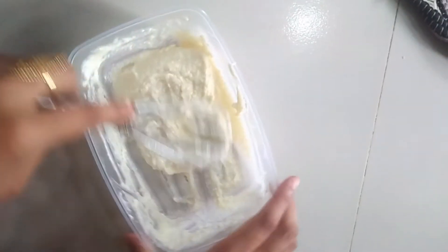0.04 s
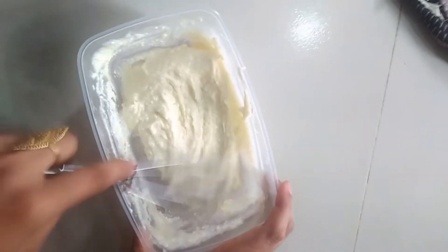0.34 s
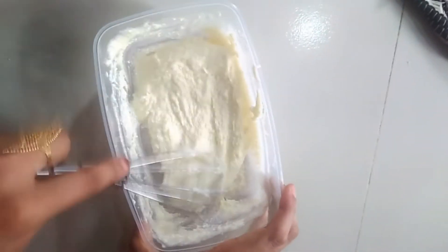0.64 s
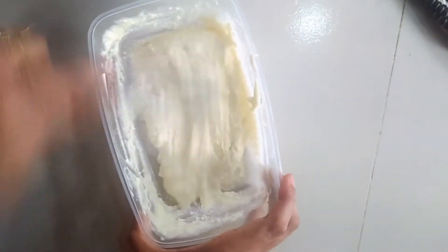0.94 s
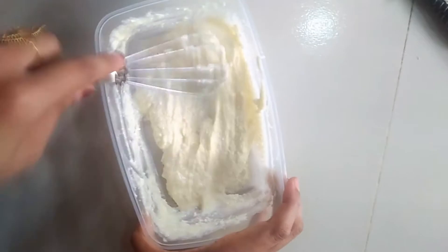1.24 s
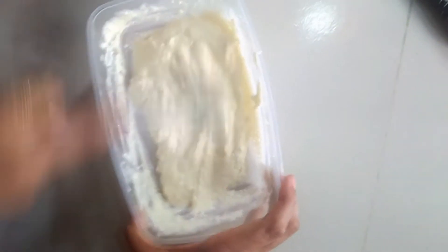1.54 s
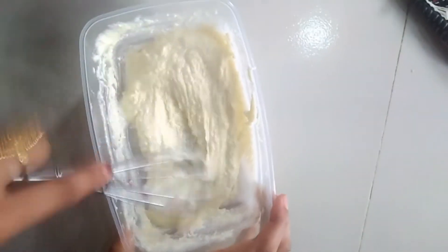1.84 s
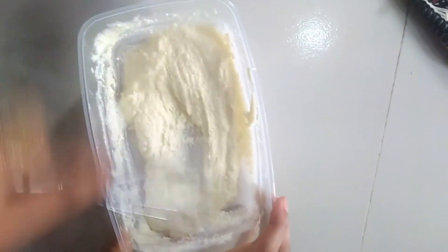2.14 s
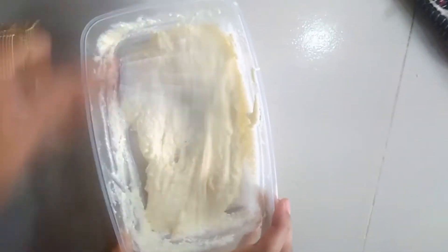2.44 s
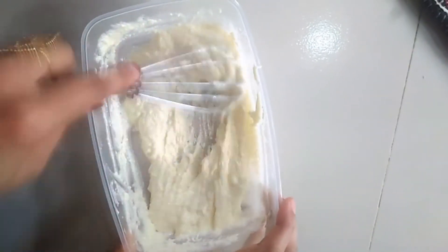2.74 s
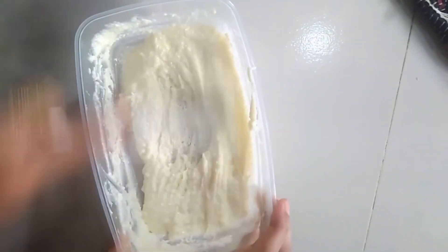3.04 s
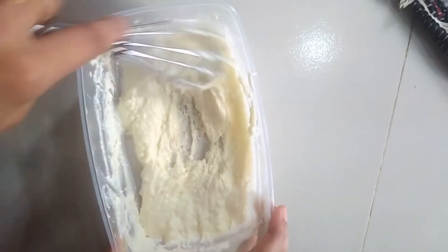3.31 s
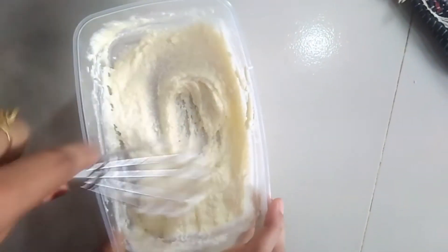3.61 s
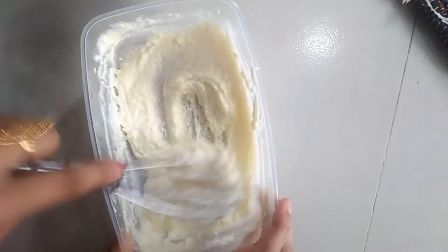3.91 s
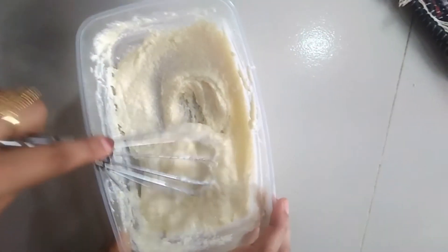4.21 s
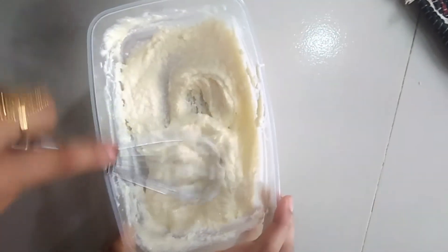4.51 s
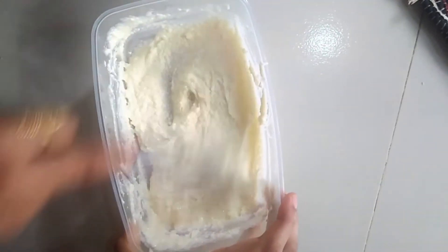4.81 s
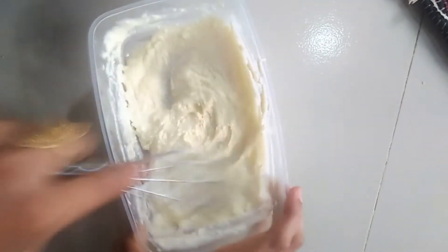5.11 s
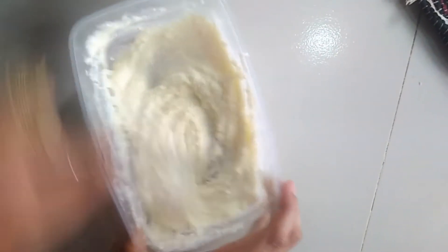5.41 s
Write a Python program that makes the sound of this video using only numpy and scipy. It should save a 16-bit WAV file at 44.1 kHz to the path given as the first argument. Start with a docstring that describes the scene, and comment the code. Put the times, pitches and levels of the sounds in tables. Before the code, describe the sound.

Irregular plastic knocks and ringing wire ticks as a whisk beats sticky cream, squelching and scraping between blows.

```python
"""Uneven plastic knocks and wiry clatter with wet squelches between: a whisk mashing thick cream in a tub.
Each blow thuds into the cream, knocks the tub's bottom, clacks its walls and sets the steel wires
chattering and ringing. Between blows the cream tears and pops, the wires drag over the plastic and
the holding hand nudges the tub. A small tiled kitchen rings on briefly over a faint hush and hum."""
import sys
import numpy as np
from scipy import signal
from scipy.io import wavfile

SR = 44100
rng = np.random.default_rng(int(sys.argv[2]) if len(sys.argv) > 2 else 0)


def digitize_waveform(pressure):
    """Quantize a signal to 16-bit integers and store it at the path in sys.argv[1].

    Rows of a 2-D input are taken as channels; values are limited to [-1, 1].
    """
    field = np.atleast_2d(pressure).T
    bounded = np.clip(field, -1, 1)
    quanta = np.round(bounded * 32767).astype(np.int16)
    wavfile.write(sys.argv[1], SR, quanta)


N = 249606

# Contacts of whisk and tub. Each row: time in seconds, then thud, bottom, wall and wire levels in dB
# (rms over 10 ms), bottom pitch in Hz, spread of the wires' landing in seconds.
BLOWS = [(.137, -71.5, -59, -64, -69.5, 852, 0.00243), (0.3699, -73.5, -45.5, -65, -77.5, 928, 0.0033),
         (0.6345, -77.5, -43.5, -51, -76, 889, 0.00612), (0.6899, -68.5, -34.5, -34, -42, 930, 0.00416),
         (.7005, -73.5, -33.5, -34.5, -47.5, 903, 0.0033), (.7055, -60, -39, -37.5, -46, 798.5, 0.001996),
         (0.8187, -67.5, -39.5, -43, -45, 983, 0.0023), (0.9804, -57, -46.5, -46, -60.5, 862, 0.00455),
         (1.064, -94.5, -35.5, -36.5, -44, 861.5, 0.00386), (1.176, -66.5, -41, -37.5, -38, 728, 0.00475),
         (1.1885, -84.5, -40.5, -50.5, -65.5, 830, 0.00497), (1.2137, -52.5, -42.5, -45, -57.5, 963, .005),
         (1.309, -79.5, -37, -38.5, -41.5, 851.5, 0.00501), (1.3851, -80.5, -48, -60, -70, 940, 0.0044),
         (1.4276, -64, -41.5, -42.5, -48, 864, 0.00218), (1.485, -52.5, -30.5, -41.5, -48, 880.6, 0.00237),
         (1.561, -72.5, -35.5, -36.5, -40, 823.4, 0.00258), (1.6408, -74, -49, -52.5, -58, 817, 0.0027),
         (1.6705, -60.5, -39.5, -36.5, -40.5, 751, 0.0033),
         (1.7968, -63.5, -53, -51.5, -46.5, 696, 0.00284), (1.9245, -65, -38.5, -41, -38, 852, 0.004),
         (2.0363, -67, -54.5, -42, -46.5, 792, 0.0018), (2.1716, -67.5, -40.5, -39, -43, 839, 0.00502),
         (2.1839, -76, -42.5, -51.5, -52, 830.5, 0.00331), (2.294, -62.5, -46.5, -36, -37.5, 788, 0.00377),
         (2.4256, -57, -35, -35, -35.5, 782.6, 0.00414), (2.4799, -55, -29, -45, -50, 904.4, 0.00161),
         (2.5582, -70, -41, -38, -38.5, 707, 0.00342), (2.7222, -46.5, -26.5, -32.5, -40, 842, 0.00193),
         (2.9605, -43.5, -27, -27, -39, 846, 0.00221), (3.3662, -47, -36.5, -41.5, -79.5, 827.3, 0.00343),
         (3.4247, -45.5, -38, -33.5, -50.5, 930, 0.00197), (3.534, -71, -43, -55, -94, 886, 0.00365),
         (3.5623, -63, -42, -43.5, -55, 876, 0.00311), (3.833, -95.5, -38, -40, -56, 1029, 0.00167),
         (3.8537, -53.5, -40.5, -36, -59.5, 895, 0.00065), (4.054, -57.5, -32.5, -37.5, -51, 868, 0.0034),
         (4.2339, -57, -40, -45, -59.5, 940, 0.00769), (4.2438, -78, -32.5, -35, -36, 1008, 0.00189),
         (4.2481, -48, -34, -40.5, -45.5, 882.6, 0.00117), (4.414, -66, -60.5, -48, -56.5, 1010, 0.0023),
         (4.4279, -52.5, -29, -25.5, -29, 876, 0.0037), (4.6028, -51, -28, -24, -33.5, 949, 0.00219),
         (4.6085, -66, -32, -38.5, -35, 804, 0.00145), (4.789, -75, -40, -47, -50, 925.6, 0.00215),
         (4.9253, -74, -49.5, -47, -54, 754, 0.00346), (4.9466, -52, -44, -44, -49.5, 833, 0.00314),
         (4.998, -78, -44.5, -53.5, -64.5, 1001, 0.00224), (5.0457, -64, -47, -59.5, -54.5, 960, 0.00267),
         (5.1286, -50.5, -39, -48.5, -67, 811.6, 0.00273), (5.1475, -77, -45, -58.5, -75, 847, 0.0014),
         (5.2505, -51.5, -49, -43.5, -47.5, 836, 0.00162), (5.4036, -54.5, -40.5, -58, -69, 831, 0.00157),
         (5.5099, -48.5, -47, -43, -46, 852, 0.00283), (5.586, -79.5, -40.5, -44.5, -55, 875, 0.00586),
         (5.6556, -50, -44, -50, -75, 746, 0.00341)]
# The part of the tub being worked. Each row: time in seconds, favoured wall and sway pitches in Hz.
PLACE = [(1.06, 1390, 260), (1.18, 2035, 279.5), (2.56, 2294, 329.5), (2.72, 1340, 320), (2.96, 1655, 318),
         (3.4, 1500, 162), (3.85, 1346, 241), (4.65, 1462, 299), (5.1, 1417, 168), (5.66, 1410, 150)]
# Low modes of the loaded tub. Each row: frequency in Hz, relative level in dB, t60 in seconds.
SWAY_MODES = [(100, -7, 0.0382), (177.9, 4.5, 0.04125), (286.2, 3, 0.0442), (449.4, 1.5, 0.0348)]
# Steady stirring between blows. Each row: time in seconds, squelch level in dB, rubbing level in dB.
STIR = [(0, -68.5, -72), (.1, -94, -71), (.34, -93, -80.5), (.38, -78, -58.5), (.6, -75.5, -71),
        (.72, -65.5, -59), (1.55, -68.5, -55.5), (1.8, -63.5, -66.5), (2.12, -67.5, -64),
        (2.6, -61.5, -64.5), (2.88, -73, -65), (3.3, -92.5, -72), (3.6, -85, -63), (3.8, -104, -70.5),
        (4.2, -78.5, -65), (4.4, -68, -59.5), (4.95, -65.5, -62), (5.66, -61.5, -62)]
# The wet sizzle of cream. Each row: frequency in Hz, relative level in dB.
SQUELCH_COLOUR = [(1500, -18), (2600, -7.5), (3400, -11.5), (4600, -13), (5600, -13.5), (7000, -5.5),
                  (9000, 0), (11500, -7.5), (14300, -13)]


def tub(size=1500, push_db=-17, push_lead_s=0.006416):
    """Each blow sways the tub with a soft thud and knocks its bottom."""
    # Each row: multiple of the bottom's pitch, relative level in dB, t60 in seconds.
    bottom_modes = [(.78, -11.5, 0.01514), (1, 2, 0.01927), (1.2, -14, 0.0193)]
    t, sway_t, out = np.arange(size) / SR, np.arange(2 * size) / SR, np.zeros(N)
    place_s, _, sway_hz = np.transpose(PLACE)
    for s, thud_db, bottom_db, _, _, bottom_hz, spread in BLOWS:
        sway = swaying(np.interp(s, place_s, sway_hz))
        thud = ring(sway, sway_t, rng.uniform(0.9213, 1.075), rise=0.00604)
        add(out, s - .005, sized(thud, thud_db))
        bottom = ring(bottom_modes, t, bottom_hz, rise=0.00159)
        # the cream passes the push on just before the wires arrive
        push = signal.fftconvolve(chatter(t, 0.0013, per_s=4200), bottom)[:size]
        add(out, s - push_lead_s, sized(push, bottom_db + push_db))
        # one firm hit, roughened by the other wires
        spread = np.clip(spread, .0008, .02)
        force = 0.618 * chatter(t, spread, per_s=4300)
        force[round(.25 * spread * SR)] += 1
        knock = signal.fftconvolve(force, bottom)[:size]
        add(out, s - .0007, sized(knock, bottom_db))
    return out


def swaying(favoured_hz, db_per_octave=6.5):
    """The tub's sway modes, weaker the further they lie from the favoured pitch."""
    return [(hz, db - db_per_octave * abs(np.log2(hz / favoured_hz)), t60) for hz, db, t60 in SWAY_MODES]


def walls(size=1100, focus_db_per_octave=7, cushion=0.286):
    """Plastic clacks: each blow's place favours wall modes near one pitch; clinging cream detunes them."""
    # Each row: frequency in Hz, relative level in dB, t60 in seconds.
    wall_modes = [(1159.3, -3, 0.0324), (1361.6, 3.5, 0.0188), (1592, 2, 0.01933), (1816, -0.5, 0.0236),
                  (2026, 1, 0.01855), (2302.8, 3, 0.02013), (2740, -3, 0.0216)]
    t, out = np.arange(size) / SR, np.zeros(N)
    place_s, wall_hz, _ = np.transpose(PLACE)
    for s, _, _, wall_db, wire_db, _, spread in BLOWS:
        favoured_hz = np.interp(s, place_s, wall_hz)
        tilt_db_per_octave = cushion * (wire_db - wall_db)  # darker as cream muffles the wires
        struck = []
        for hz, db, t60 in wall_modes:
            octaves = np.log2(hz / favoured_hz)
            mode_db = db - focus_db_per_octave * abs(octaves) + tilt_db_per_octave * octaves
            struck.append((hz * rng.uniform(0.9405, 1.0617), mode_db, t60))
        force = chatter(t, 0.822 * max(spread, .0008), per_s=5600)
        clack = signal.fftconvolve(force, ring(struck, t, rise=0.00032))[:size]
        add(out, s - .0004, sized(clack, wall_db))
    return out


def wires(size=1500, scrape_offset_db=-2.364, thud_share=0.1706):
    """Steel on plastic: every contact is a burst of scraping and bright ticks."""
    # Each row of both: frequency in Hz, relative level in dB.
    scrape_colour = [(2000, -45.5), (2900, 2.5), (3300, 0.5), (3800, 4.5), (4600, 3.5), (5500, 0),
                     (6400, 0.5), (7500, -32)]
    tick_colour = [(5000, -45.5), (6600, -2.5), (7800, -3), (9000, 0.5), (10500, -3.5), (12500, -7),
                   (14300, -11)]
    t, scrape, tick = np.arange(size) / SR, np.zeros(N), np.zeros(N)
    for s, thud_db, _, _, tick_db, _, spread in BLOWS:
        # the scrape follows the tick and, in part, the push into the cream
        scrape_db = tick_db + scrape_offset_db + thud_share * (thud_db - tick_db)
        force = chatter(t, 1.255 * max(spread, .0008), per_s=5000)
        add(scrape, s - .0002, sized(force, scrape_db))
        add(tick, s - .0002, sized(force, tick_db))
    return coloured(scrape, scrape_colour) + coloured(tick, tick_colour)


def clatter():
    """The bright edge of the blows: clacking walls and ticking wires."""
    return walls() + wires()


def wire_loops(offset_db=-14, scatter_db=6.5, detune=0.01424, size=9000):
    """Each blow leaves the whisk's loops ringing, a different few standing out each time."""
    # Each row: frequency in Hz, relative level in dB, t60 in seconds.
    loop_modes = [(3790, -8, 0.283), (4600, -8, 0.29), (4770, -7, .25), (5320, -11, 0.24), (6870, -7, 0.26),
                  (7150, -3.5, 0.32), (8870, 1.5, 0.32), (9240, 0, .14), (9600, -2.5, .2),
                  (10350, 1.5, 0.18)]
    t, out = np.arange(size) / SR, np.zeros(N)
    for s, _, _, _, wire_db, _, _ in BLOWS:
        struck = [(hz * (1 + detune * rng.standard_normal()), db + scatter_db * rng.standard_normal(), t60)
                  for hz, db, t60 in loop_modes]
        add(out, s, sized(ring(struck, t), wire_db + offset_db))
    return out


def cream(tear_db=-11, wall_share=0.0845 + 0.0005, size=6000):
    """Stirred cream squelches, tears off the wires after each blow and lets air pockets snap or swish; two
    faint wire ticks sound among them."""
    # Air pockets that snap or swish, and two faint wire ticks of light blows (1.015 s and 1.136 s). Each row:
    # start in seconds, level in dB (rms over 10 ms), spread in seconds.
    pops = [(0.524, -69.5, 0.0033), (1.015, -58, 0.0045), (1.048, -69.5, 0.0025),
            (1.136, -56, 0.0048), (1.302, -63, .0027), (1.463, -58, 0.0031), (1.865, -62.5, 0.0042),
            (2.596, -52, 0.01), (2.79, -57, 0.027), (2.841, -57, 0.0043), (2.9317, -45.5, 0.00484),
            (2.942, -48, 0.027), (3.031, -50.5, 0.0306), (3.059, -56, 0.0029), (3.161, -59, 0.034),
            (3.387, -55.5, .035), (5.419, -56.5, 0.0035), (5.474, -52, 0.0066),
            (5.511, -40.5, 0.0022), (5.594, -53, 0.0051)]
    stir_s, squelch_db, _ = np.transpose(STIR)
    blow_s, _, _, wall_db, wire_db, _, _ = np.transpose(BLOWS)
    t = np.arange(N) / SR
    stirring = gain_of(np.interp(t, stir_s, squelch_db))
    tearing = aftermath(blow_s, wire_db + tear_db + wall_share * (wall_db - wire_db), fade_db_per_s=180.5)
    squelch = crackle(per_s=2500, smear=0.397) * np.hypot(stirring, tearing)
    for s, db, spread in pops:
        add(squelch, s, sized(chatter(t[:size], spread, per_s=5800), db))
    return coloured(squelch, SQUELCH_COLOUR)


def rubbing(slide_db=-14):
    """The whisk rubs the tub with a dull grain as it stirs, and slides on after each blow."""
    # Each row: frequency in Hz, relative level in dB.
    rub_colour = [(300, -59.5), (550, -14), (750, -4.5), (900, 2), (1100, -1), (1500, -7), (2200, -13.5),
                  (3000, -31.5)]
    stir_s, _, rub_db = np.transpose(STIR)
    blow_s, _, bottom_db, wall_db, _, _, _ = np.transpose(BLOWS)
    stirring = gain_of(np.interp(np.arange(N) / SR, stir_s, rub_db))
    sliding = aftermath(blow_s, (bottom_db + wall_db) / 2 + slide_db, fade_db_per_s=200)
    return coloured(crackle(per_s=660, smear=0.156) * np.hypot(stirring, sliding), rub_colour)


def dragging():
    """Wires drag over the plastic in thin, scratchy strokes, each swelling and fading in one arch."""
    # Each row: start in seconds, length in seconds, level at the crest in dB.
    strokes = [(0.595, 0.54, -71.5), (4.305, 0.52, -64), (4.78, 0.442, -69.5), (5.272, 0.184, -67.5),
               (5.462, 0.031, -56), (5.525, 0.186, -70)]
    # Each row: frequency in Hz, relative level in dB.
    drag_colour = [(2800, -23.5), (3700, -13.5), (4200, -6.5), (4550, 2.5), (5000, -4.5), (5500, -12),
                   (7000, -18)]
    level = np.zeros(N)
    for s, length, db in strokes:
        add(level, s, gain_of(db) * np.sin(np.linspace(0, np.pi, round(length * SR))))
    return coloured(crackle(per_s=240, smear=0.121) * level, drag_colour)


def bubbles(per_s=16, offset_db=-1, range_db=6, size=800):
    """Small bubbles burst at random, near the level of the stirred cream."""
    stir_s, squelch_db, _ = np.transpose(STIR)
    t, out = np.arange(size) / SR, np.zeros(N)
    for when, strength in rng.random((round(per_s * N / SR), 2)):
        s = when * N / SR
        db = np.interp(s, stir_s, squelch_db) + offset_db + range_db * (2 * strength - 1)
        add(out, s, sized(chatter(t, spread=.002, per_s=3800), db))
    return coloured(out, SQUELCH_COLOUR)


def handling(per_s=14, level_db=-70, range_db=5, t60=0.0413, size=3000):
    """The holding hand nudges the tub at random, each bump near one of its sway modes."""
    t, out = np.arange(size) / SR, np.zeros(N)
    for when, strength, which, grip in rng.random((round(per_s * N / SR), 4)):
        hz = SWAY_MODES[int(which * len(SWAY_MODES))][0] * (0.9273 + 0.192 * grip)
        bump = ring([(hz, 0, t60)], t, rise=0.009)
        add(out, when * N / SR, sized(bump, level_db + range_db * (2 * strength - 1)))
    return out


def kitchen(body, directions=3, crossfades_per_s=10):
    """The reflections change as the tub moves; walls and wires send a different clatter each way."""
    position = crossfades_per_s * np.arange(N) / SR
    out = np.zeros(N)
    for k in range(directions):
        share = np.sin(np.pi / 2 * np.minimum((position - k) % directions, 2))
        send = body * share + clatter() / np.sqrt(directions)
        out += signal.oaconvolve(send, reflections())[:N]
    return out


def reflections(per_s=6000, first_s=0.00411, build_s=0.00433, size=20000):
    """Dense echoes from tiles and walls, each band dying at its own speed."""
    # Each row: frequency in Hz, t60 in seconds.
    room_decay = [(150, 0.51), (500, 0.3456), (900, 0.2564), (1700, 0.276), (4000, 0.2536), (9000, 0.0079),
                  (14000, 0.02)]
    # Each row: frequency in Hz, level of the room's ring in dB.
    room_colour = [(150, -1.5), (500, -1.5), (900, -11), (1600, -2), (2400, -9), (4000, -4.5), (6000, -4),
                   (9000, -6.5), (14000, -12)]
    echoes = rng.choice([-1, 1], size) * (rng.random(size) < per_s / SR)
    hz, t, bands = signal.stft(evened(echoes) / np.sqrt(SR), SR, nperseg=256)
    t60 = curve_at(room_decay, hz)[:, None]
    bands *= gain_of(curve_at(room_colour, hz)[:, None] - 60 * t / t60)
    bands *= np.sqrt(np.log(10 ** 6) / t60)  # a longer decay adds no energy
    tail = signal.istft(bands, SR, nperseg=256)[1][:size]
    return tail * np.clip((np.arange(size) / SR - first_s) / build_s, 0, 1)


def hush(noise_db=-67.5, hum_hz=64, hum_db=-80, waver_db=3, waver_points=80):
    """Faint, wavering room noise with a low hum."""
    # Each row: frequency in Hz, relative level in dB.
    hush_colour = [(25, -22), (55, -0.5), (85, -1.5), (120, -2), (190, -13), (290, -8), (360, -13.5),
                   (440, -5), (560, -11), (850, -7), (1400, -11.5), (2400, -19), (3200, -34), (8000, -35),
                   (15000, -41)]
    t = np.arange(N) / SR
    gains = gain_of(waver_db * rng.uniform(-0.97, 1, waver_points))
    waver = np.interp(t, np.linspace(0, t[-1], waver_points), gains)
    noise = coloured(rng.standard_normal(N), hush_colour, size=4096) * waver
    return gain_of(noise_db) * noise + gain_of(hum_db) * evened(np.sin(2 * np.pi * hum_hz * t))


def ring(modes, t, pitch=1, rise=.0005):
    """Damped modes of alternating polarity that take a moment to build up."""
    partials = ((-1) ** k * gain_of(db - 60 * t / t60) * np.sin(2 * np.pi * hz * pitch * t)
                for k, (hz, db, t60) in enumerate(modes))
    return (1 - np.exp(-t / rise)) * sum(partials)


def chatter(t, spread, per_s):
    """A short shower of clicks, as of wires landing in turn; it peaks at half the spread and fades."""
    age = 2 * t / spread
    clicks = (rng.random(len(t)) < per_s / SR) * rng.choice([-1, 1], len(t))
    force = (clicks + 0.1676 * rng.standard_normal(len(t))) * age * np.exp(-age)
    return force / np.linalg.norm(force)


def crackle(per_s, smear, clump_points=380):
    """Tiny pops of unequal size over a smooth smear, in clumps as the cream sticks and lets go."""
    gains = gain_of(4.5 * rng.uniform(-3.1, 1.4, clump_points))
    clumps = np.interp(np.arange(N), np.linspace(0, N, clump_points), gains)
    return evened(clumps * rng.standard_normal(N) * (smear + (rng.random(N) < per_s / SR)))


def aftermath(starts, levels_db, fade_db_per_s, rise_s=0.0069, size=22000):
    """Level curve of what follows each blow: a quick rise and a steady fade."""
    t, power = np.arange(size) / SR, np.zeros(N)
    for s, db in zip(starts, levels_db):
        add(power, s, (np.minimum(t / rise_s, 1) * gain_of(db - fade_db_per_s * t)) ** 2)
    return np.sqrt(power)


def coloured(x, colour, size=1024):
    """Minimum-phase filter that shapes the tone and keeps the level of white noise."""
    log_gain = curve_at(colour, abs(np.fft.fftfreq(size, 1 / SR))) * np.log(10) / 20
    taps = np.fft.ifft(np.exp(np.conj(signal.hilbert(log_gain)))).real
    return signal.oaconvolve(x, taps / np.linalg.norm(taps))[:len(x)]


def curve_at(points, hz):
    """Reads a curve on a log-frequency axis."""
    point_hz, value = np.transpose(points)
    return np.interp(np.log(hz + 1), np.log(point_hz + 1), value)


def gain_of(db):
    """Decibels to a factor."""
    return 10 ** (np.asarray(db) / 20)


def evened(x):
    """Scales to rms 1."""
    return x / np.sqrt(np.mean(x ** 2) + 1e-20)


def sized(x, db):
    """Gives a short sound the energy of 10 ms at this level."""
    return gain_of(db) * x / np.sqrt(np.sum(x ** 2) / (SR / 100) + 1e-20)


def add(mix, s, sound):
    """Mixes a sound in at s seconds."""
    part = mix[max(round(s * SR), 0):][:len(sound)]
    part += sound[:len(part)]


def scene():
    """Whisk, tub and cream in the kitchen, in mono."""
    body = tub() + cream() + rubbing() + dragging() + bubbles() + handling()
    return (body + clatter() + wire_loops() + kitchen(body) + hush())[None]


def record(dry):
    """A steep low-pass trims the highest treble."""
    lowpass = signal.firwin(401, cutoff=14450, window=("kaiser", 8), fs=SR)
    return signal.oaconvolve(dry, lowpass[None], "same")


dry = scene()
out = record(dry)
digitize_waveform(out)
```